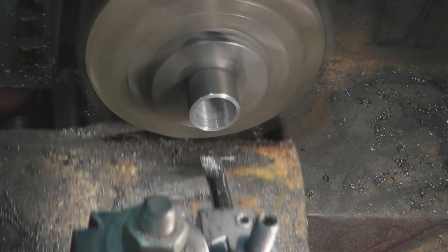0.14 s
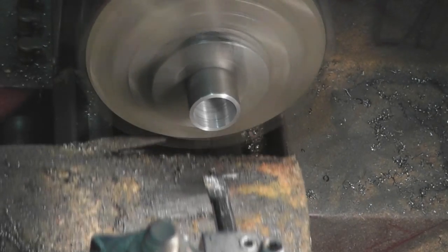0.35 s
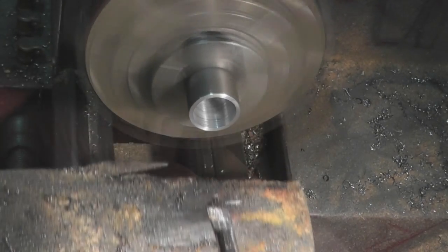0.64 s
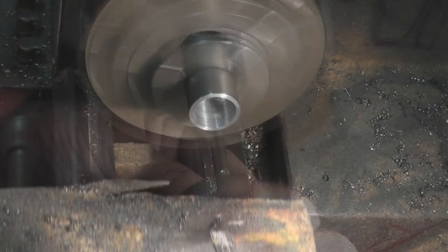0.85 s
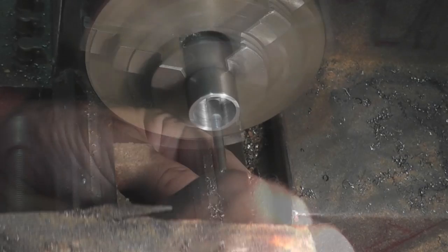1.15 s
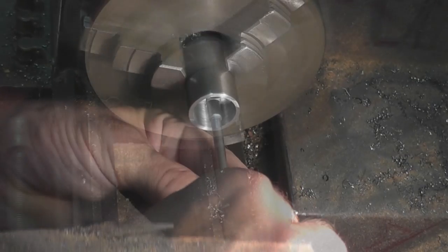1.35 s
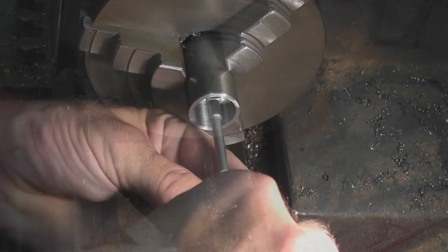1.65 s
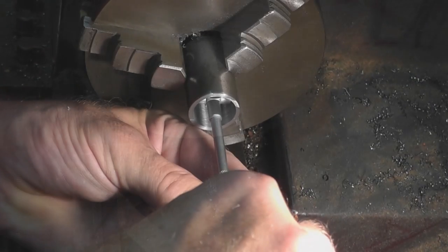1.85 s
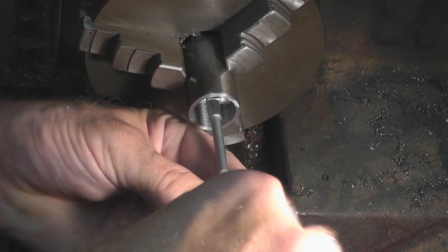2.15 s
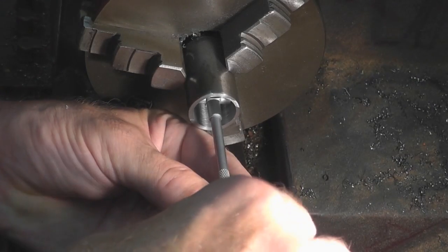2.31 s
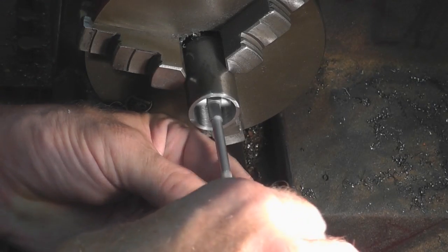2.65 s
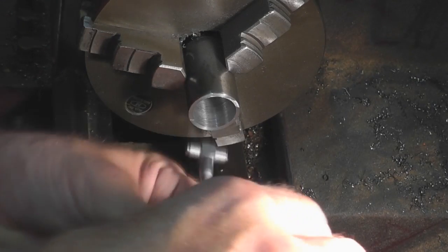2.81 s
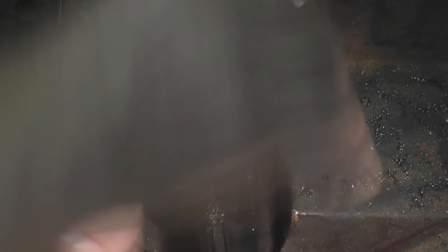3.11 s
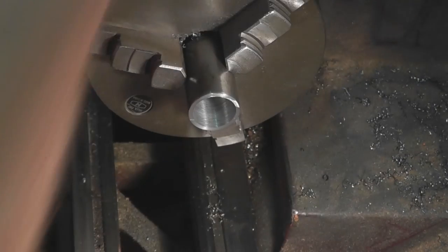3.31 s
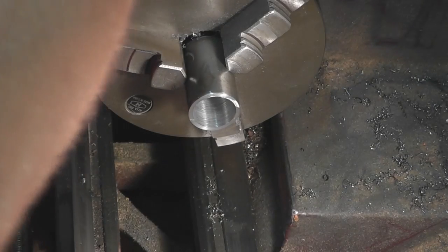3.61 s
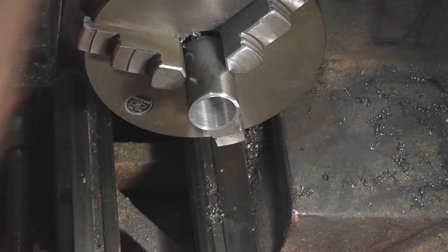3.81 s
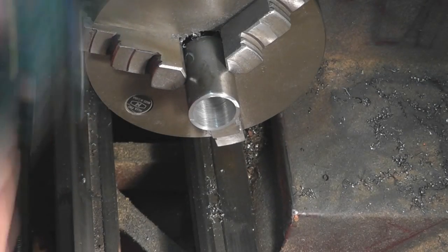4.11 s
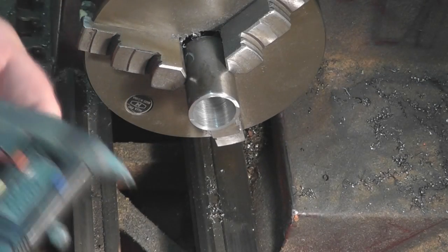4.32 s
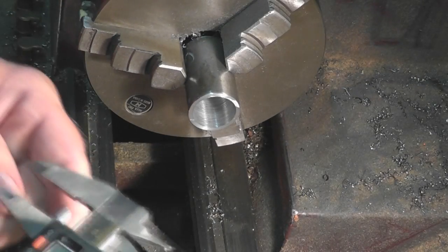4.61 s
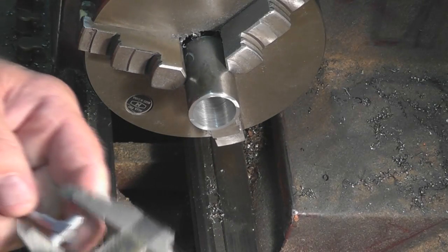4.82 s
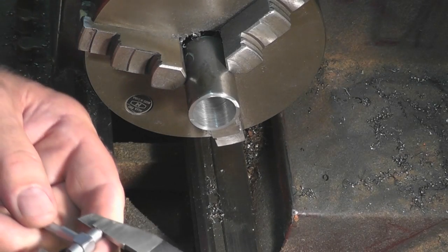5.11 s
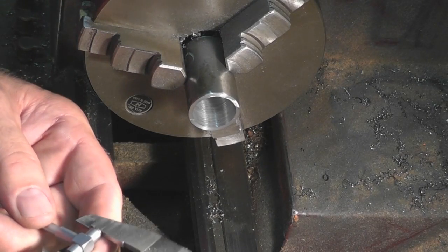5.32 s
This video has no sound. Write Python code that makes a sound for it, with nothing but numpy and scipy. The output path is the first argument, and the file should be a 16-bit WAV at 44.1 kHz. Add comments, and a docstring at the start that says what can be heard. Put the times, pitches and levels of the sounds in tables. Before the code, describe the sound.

A metal lathe coasts to a stop, its gear whir dropping in pitch and fading while loose steel clinks and the carriage rubs and clanks. A steel gauge ticks and scrapes lightly inside the workpiece, then is put down on a hollow board with a sharp, rattling knock. Calipers slide softly and click a few times. It all sounds fairly close, in a small workshop with a faint steady hum.

```python
"""A metal lathe coasts to a stop in a small workshop: its gear teeth excite the resonances of the
casting ever more slowly and its bearings hiss, while the carriage rubs and clanks and loose parts clink.
A steel gauge ticks and scrapes in the bore of the workpiece, then is put down on a hollow board,
whose modes give a low knock. Calipers slide with a soft friction hiss and click on contact.
Reverberation surrounds the contacts, over steady air noise and a faint low hum."""
import sys
import numpy as np
from scipy import signal
from scipy.fft import rfft, irfft, next_fast_len
from scipy.io import wavfile
from scipy.ndimage import map_coordinates

SR = 44100
rng = np.random.default_rng(int(sys.argv[2]) if len(sys.argv) > 2 else 0)


def inscribe(sig):
    """Save sig as 16-bit PCM at rate SR to the path in sys.argv[1].

    A 1-D sig is mono; a 2-D sig holds one channel per row.
    Samples are clipped to [-1, 1] before scaling.
    """
    pcm = np.round(np.clip(np.atleast_2d(sig).T, -1, 1) * 32767)
    wavfile.write(sys.argv[1], SR, pcm.astype(np.int16))


N = 240596
TIME = np.arange(N) / SR
SIZE = next_fast_len(N + SR // 2, real=True)
FREQ = np.fft.rfftfreq(SIZE, 1 / SR)
STOP_S = 2.13  # the spindle comes to rest


def amp(db):
    """Decibels to amplitude ratio."""
    return 10 ** (np.asarray(db) / 20)


def unit(x):
    """Normalisation to rms 1."""
    return x / np.sqrt(np.mean(x ** 2) + 1e-20)


def along(points, hz):
    """Interpolation of (Hz, value) points on a logarithmic frequency axis."""
    f, v = np.transpose(points)
    return np.interp(np.log(hz + 1), np.log(f + 1), v)


def wobble(rate):
    """Random modulation: a smooth curve with rate knots a second."""
    knots = rng.standard_normal(int(N * rate / SR) + 4)
    return unit(map_coordinates(knots, [TIME * rate]))


def add(track, s, sound):
    """Superposition of a sound on a track at s seconds."""
    start = max(round(s * SR), 0)
    track[start:start + len(sound)] += sound[:N - start]


def body(x, spectrum, peaks=(), size=16384):
    """Resonant filtering: a minimum-phase response of unit energy, a broad spectrum with peaks."""
    hz = np.fft.rfftfreq(size, 1 / SR)
    lift = 1 + sum(amp(db) ** 2 / (1 + (2 * (hz - centre) / width) ** 2) for centre, width, db in peaks)
    cepstrum = irfft(np.log(amp(along(spectrum, hz)) * np.sqrt(lift)))
    response = irfft(np.exp(rfft(2 * cepstrum[:size // 2], size)))
    return signal.oaconvolve(x, response / np.linalg.norm(response))[:N]


def spread(a, b, coherence):
    """Partial coherence: two independent signals mix into a correlated stereo pair."""
    angle = np.arccos(np.clip(along(coherence, FREQ), -1, 1)) / 2
    mid, side = irfft(rfft([a, b], SIZE) * [np.cos(angle), np.sin(angle)], SIZE)[:, :len(a)]
    return np.array([mid + side, mid - side])


def contact(db, rise, t60):
    """Contact chatter: a force of random sign that swells and decays exponentially."""
    t = TIME[:SR // 4]
    return amp(db - 60 * t / t60) * (1 - np.exp(-t / rise)) * np.sign(rng.standard_normal(len(t)))


def blows(rows):
    """The summed force of successive impacts."""
    force = np.zeros(N)
    for s, db, rise, t60 in rows:
        add(force, s, contact(db, rise, t60))
    return force


def soften(x, bright_hz):
    """Contact compliance: a softer contact shifts its energy away from the treble."""
    pole = np.exp(-2 * np.pi * bright_hz / SR)
    return signal.lfilter([np.sqrt(1 - pole ** 2)], [1, -pole], x)


def ringing(modes, swell_s):
    """Modal vibration: damped sinusoids that build up smoothly."""
    t = TIME[:SR // 2]
    vibration = sum(amp(db - 60 * t / t60) * np.sin(2 * np.pi * hz * t) for hz, db, t60 in modes)
    return (1 - np.exp(-t / swell_s)) ** 2 * vibration


def taps(rows, spectrum, peaks, width_hz, lift_db, t60, dulling):
    """Impact excitation: a strike and its chatter favour one resonance; hard taps ping, light ones tick."""
    out = np.zeros(N)
    hardest_db = max(row[1] for row in rows)
    for s, db, hz, bright_hz in rows:
        ping = (hz, width_hz, lift_db - dulling * (hardest_db - db))
        chatter = contact(db, 0.00029, t60)
        strike = np.linalg.norm(chatter) * signal.unit_impulse(len(chatter))
        force = amp(-1) * chatter + amp(-7) * strike
        add(out, s, body(soften(force, bright_hz), spectrum, [*peaks, ping]))
    return out


def friction(length_s, db, taper):
    """Sliding friction: a tapered burst of random force."""
    window = signal.windows.tukey(int(length_s * SR), taper)
    return amp(db) * window * rng.standard_normal(len(window))


def strokes(rows, spectrum, peaks, width_hz, lift_db, taper):
    """Frictional excitation: each stroke favours one resonance of a body."""
    out = np.zeros(N)
    for s, length_s, db, hz in rows:
        add(out, s, body(friction(length_s, db, taper), spectrum, [*peaks, (hz, width_hz, lift_db)]))
    return out


def in_room(x, wet_db, scatter_db=-4, scatter_hz=10500):
    """Scattering and reverberation: the top treble reaches left and right a little differently; the tail's
    treble dies first."""
    # Each row: frequency in Hz, reverberation time in seconds.
    decay_times = [(100, 0.91), (400, 0.29), (1400, 0.34), (4000, 0.26), (12000, 0.2)]
    # The diffuse field. Each row: frequency in Hz, left-right coherence.
    coherence = [(250, 0.35), (900, 0.13), (4000, 0.89), (14000, 0.35)]
    hz, t, noise = signal.stft(rng.standard_normal((2, SR // 2)), SR, nperseg=256)
    envelope = amp(-60 * t / along(decay_times, hz)[:, None]) * (1 - np.exp(-t / 0.00088))
    tails = signal.istft(noise * envelope, SR, nperseg=256)[1]
    tails = spread(*tails, coherence) / np.linalg.norm(tails[0])
    reverberation = signal.oaconvolve(x[None], tails, axes=1)[:, :N]
    # short waves reach left and right by different paths
    paths = rng.standard_normal(SR // 1000)
    highpass = signal.butter(2, scatter_hz, "high", fs=SR, output="sos")
    paths = signal.sosfilt(highpass, paths / np.linalg.norm(paths))
    side = amp(scatter_db) * np.convolve(x, paths)[:N]
    return np.array([x + side, x - side]) + amp(wet_db) * reverberation


def grit(rate, scatter_db):
    """A Poisson process of tiny impacts, rate a second, at rms 1."""
    hits = rng.random(N) < rate / SR
    return unit(hits * rng.standard_normal(N) * amp(scatter_db * rng.standard_normal(N)))


def lathe(full_mesh_hz=297, shake_hz=42):
    """Forced vibration: gears and bearings drive the casting while friction brakes them ever harder."""
    # Gear and bearing spectra. Each row: frequency in Hz, spectral level in dB.
    gear_spectrum = [(40, -49), (100, -18.5), (170, -2.5), (260, 1), (400, -3), (500, -5.5), (900, -8),
                     (1500, -13), (1900, -14), (3000, -27.5), (6000, -41.5)]
    bearing_spectrum = [(500, -20), (1500, 1.5), (2200, -3.5), (3800, -1.5), (4700, -8.5), (7000, -9),
                        (8500, -13.5), (11000, -16), (13000, -20.5), (16000, -28)]
    # Resonances of the casting. Each row: frequency in Hz, width in Hz, lift in dB.
    casting = [(310.5, 21, 2.5), (378.3, 15.4, 10), (459.5, 13, 3), (578.2, 7.6, 10), (752, 10, 6),
               (836, 16.6, 5.5), (904, 26, 7), (1069, 16, 10.5), (1114, 11, 3), (1326, 18, 10.5),
               (1409, 34, 10), (1520, 29, 9), (1630, 30, 2.5), (2104, 12, 6), (2227, 33, 10.5),
               (2620, 66, 7.5), (2860, 73, 4.5), (3055, 14, -1), (3300, 39, -16), (3680, 140, 0),
               (4370, 60, -19), (5103, 63, 12.5), (5760, 120, 3), (6430, 240, 6.5), (7070, 100, 4),
               (10200, 150, 2.5)]
    # Gear stage tones. Each row: multiple of the mesh rate, relative level in dB.
    stages = [(0.621, -15), (.97, -6.5), (1.19, -13), (1.941, -24)]
    # The radiated noise. Each row: frequency in Hz, left-right coherence.
    coherence = [(80, 0.21), (250, 0.91), (600, 0.61), (1200, 0.53), (3500, 0.92), (8000, 1), (14000, 0.13)]
    speed = np.clip(1 - TIME / STOP_S, 0, 1) ** 0.6  # share of full speed
    mesh_hz = full_mesh_hz * speed
    cycles = np.cumsum(mesh_hz) / SR
    phase = 2 * np.pi * cycles
    # backlash makes every tooth land with a different force
    teeth = unit(np.diff(np.floor(cycles), prepend=0) * (1 + rng.standard_normal(N)))
    rolling = spread(*rng.standard_normal((2, N)), coherence)
    gears = np.array([body(side + amp(-11) * teeth, gear_spectrum, casting) for side in rolling])
    # uneven load smears each stage's tone; slow gears radiate less
    tones = sum(amp(db + 1.5 * wobble(shake_hz)) * np.sin(order * phase + wobble(shake_hz))
                for order, db in stages)
    drone = amp(-2.5) * speed * tones
    # the rollers rub hardest as each tooth takes the load
    rubbing = spread(*rng.standard_normal((2, N)), coherence) * (1 + 0.054 * np.cos(phase))
    crackle = amp(-10) * grit(2 * mesh_hz, scatter_db=1)
    bearings = np.array([body(side + crackle, bearing_spectrum, casting) for side in rubbing])
    drag = spindle_drag()
    gear_gain = np.hypot(amp(-29) * speed ** 1.87, amp(-40) * drag)
    bearing_gain = np.hypot(amp(-36) * speed ** 2.35, amp(-50.5) * drag)
    flutter = amp(0.63 * wobble(21.3))
    return flutter * (gear_gain * (gears + drone) + bearing_gain * bearings)


def background(hum_hz=94.5):
    """Ambient noise: steady workshop air and a randomly modulated hum, a little to the right."""
    # Air noise. Each row: frequency in Hz, spectral level in dB.
    spectrum = [(20, -33), (35, -28), (50, -3), (75, -4), (130, -3.5), (250, -5), (400, -5.5), (650, -8.5),
                (950, -12.5), (1700, -19.5), (3100, -25.5), (6000, -29), (15500, -31)]
    # Its peaks. Each row: frequency in Hz, width in Hz, lift in dB.
    peaks = [(96, 15, 4.5), (192.5, 28, 1.5), (395.6, 7.9, 7.5), (883, 9.5, 9.5), (2035, 160, 5),
             (2690, 44, 7)]
    # Each row: frequency in Hz, left-right coherence.
    coherence = [(30, .2), (70, 0.69), (180, 0.55), (550, 0.34), (1650, 0.53), (4500, 1), (9000, 0.81),
                 (15000, .15)]
    air = spread(*[body(noise, spectrum, peaks) for noise in rng.standard_normal((2, N))], coherence)
    hum = amp(-61 + 1.5 * wobble(6.2)) * np.sin(2 * np.pi * hum_hz * TIME + 0.5 * wobble(13))
    return (amp(-54) * air + hum) * amp([[-0.5], [0.5]])


def carriage(groan_s=1.026, groan_hz=390):
    """Friction, then impact: the carriage rubs along its ways and its slide sets the bed ringing."""
    # Each row: start in seconds, length in seconds, level in dB, resonance in Hz.
    rubs = [(0, 0.049, -24.5, 288.5), (.452, 0.046, -26.5, 757), (1.005, 0.034, -30, 390),
            (1.04, 0.035, -31, 940)]
    # Impact and rebound. Each row: start in seconds, relative level in dB, rise and t60 in seconds.
    clanks = [(1.077, -9.5, 0.0056, 0.069), (1.09, -23.5, 0.004, 0.12)]
    # Spectra of ways and slide. Each row: frequency in Hz, spectral level in dB.
    ways_spectrum = [(100, -19), (300, 3.5), (800, 3.5), (1500, 1), (2300, -7), (3200, -9), (4200, -12),
                     (6500, -17), (10000, -34), (16000, -56)]
    slide_spectrum = [(40, -18), (150, -4), (400, 2), (1000, 1), (2000, -2.5), (4000, 0.5), (5200, -9),
                      (6500, -10.5), (9500, -8.5), (12000, -13), (16000, -17)]
    # Their resonances. Each row: frequency in Hz, width in Hz, lift in dB.
    ways_peaks = [(2910, 93, 16.4), (1550, 53, 2.8), (6540, 150, 3.8)]
    slide_peaks = [(570, 27, 17.5), (1484, 28, 9.5), (2820, 43, 10), (3730, 280, 4.5), (6320, 120, 17),
                   (8070, 290, 13), (8900, 150, -7), (9800, 120, 1), (11170, 260, 15)]
    # Each row: frequency in Hz, level in dB, t60 in seconds.
    bed_modes = [(555, -36, 0.14), (588, -33, 0.24), (776, -27, 0.17), (1390, -27, 0.23)]
    rubbing = strokes(rubs, ways_spectrum, ways_peaks, width_hz=17.6, lift_db=19, taper=0.23)
    clank = amp(0.5) * body(blows(clanks), slide_spectrum, slide_peaks)
    add(clank, clanks[0][0], ringing(bed_modes, swell_s=0.006))
    # friction pumps up the bed's lowest mode just before the slide hits
    add(clank, groan_s, ringing([(groan_hz, -5, 0.21)], swell_s=0.038))
    return in_room(rubbing + clank, wet_db=-7)


def loose_parts(jingles_per_s=7, jingle_hz=3920, heavy_db=-26):
    """Impact ringing of loose steel: clear clinks, and faint random ones that fade as the lathe slows."""
    # Each row: start in seconds, level in dB, resonance in Hz.
    clinks = [(.1072, -14.5, 3680), (.1262, -20.5, 3760), (.2753, -26.5, 4130), (.3606, -29, 5510),
              (.38, -29.5, 3620), (.6045, -31.5, 4970), (1.2216, -33, 4280), (1.5165, -36.5, 3370),
              (1.8397, -39, 3630), (1.9784, -42.5, 3460), (1.9939, -41.5, 3480), (2.0822, -50, 3800),
              (2.197, -54, 3400)]
    # The steel parts. Each row: frequency in Hz, spectral level in dB.
    spectrum = [(200, -32), (2200, -8), (3400, 3.5), (6000, -0.5), (8000, -2), (12000, -18), (16000, -22)]
    count = round(jingles_per_s * STOP_S)
    scatter = rng.standard_normal((count, 2))
    progress = (np.arange(count) + rng.random(count)) / count
    jingles = [(share * STOP_S, -37 - 17 * share + 5 * size, jingle_hz * 2 ** (0.2 * pitch))
               for share, (size, pitch) in zip(progress, scatter)]
    # heavier parts make duller contacts
    rows = [(s, db, hz, 7000 / 2 ** (0.076 * max(db - heavy_db, 0))) for s, db, hz in [*clinks, *jingles]]
    clinking = taps(rows, spectrum, [], width_hz=110, lift_db=15, t60=0.022, dulling=0.23)
    return in_room(clinking, wet_db=-7.5)


def sliding_steel():
    """Friction noise: smooth steel faces slide over each other with a soft, narrow hiss."""
    # Each row: start in seconds, length in seconds, level in dB, resonance in Hz.
    swishes = [(.46, 0.2, -63, 6550), (1.915, 0.035, -64, 6600), (3.645, 0.039, -54, 7850),
               (4.53, 0.11, -61, 12100), (4.795, 0.097, -65, 6050)]
    # The hiss. Each row: frequency in Hz, spectral level in dB.
    spectrum = [(1500, 6), (4000, 1), (7000, 1), (11000, 4.5), (14000, -8.5), (16000, -18.5)]
    return in_room(strokes(swishes, spectrum, [], width_hz=260, lift_db=12, taper=0.33), wet_db=-4.5)


def spindle_drag(start_s=1.828, rise_s=0.018, t60=0.97, release_s=0.073):
    """Envelope of frictional drag: the spindle catches, drags ever more weakly and lets go at rest."""
    t = np.maximum(TIME - start_s, 0)
    release = np.clip((STOP_S - TIME) / release_s, 0, 1) ** 2
    return (1 - np.exp(-t / rise_s)) * amp(-60 * t / t60) * release


def gauge_in_bore(rise_s=0.00058, t60=0.03, slip_s=0.007):
    """Stick and slip: the gauge catches with a tick, then scrapes on, exciting the bore's resonances."""
    # Each row: start in seconds, tick level in dB, scrape level in dB, scrape length in seconds.
    touches = [(2.5889, -43.5, -64, .012), (2.6697, -48.5, -67.5, 0.013), (2.8085, -40, -47.5, 0.032),
               (2.847, -32.5, -36, 0.019)]
    # The gauge. Each row: frequency in Hz, spectral level in dB.
    spectrum = [(100, -22), (350, 4.5), (900, 5.5), (2700, -7.5), (3700, -4.5), (6000, 2.5), (8000, -6),
                (13000, -4.5), (16000, -14)]
    # Each row: frequency in Hz, width in Hz, lift in dB.
    bore_peaks = [(368, 38, 17), (2010, 15, 17.5), (2670, 28, 7), (3660, 130, 12), (5220, 140, 19.5),
                  (6250, 62, 8.5), (10160, 300, 8.5)]
    force = blows([(s, db, rise_s, t60) for s, db, _, _ in touches])
    for s, _, db, length_s in touches:
        add(force, s + slip_s, friction(length_s, db, taper=0.6))
    return in_room(body(force, spectrum, bore_peaks), wet_db=-9.5)


def gauge_contacts(rattle_s=0.0145, rock_s=0.0358, loss_db=5.5):
    """Inelastic rebound: after each landing the gauge's sliding parts rattle and it rocks twice."""
    # The gauge brushes the board, then lands on one end, flat, and on the other end.
    # Each row: start in seconds, crack level in dB, rise in seconds, board level in dB,
    # steel level relative to the crack in dB, contact brightness in Hz.
    landings = [(3.661, -57, .006, -38.5, -20, 9000), (3.7703, -30.5, 0.00018, -19.5, -25, 20000),
                (3.8059, -16, 0.0003, -5, -15.5, 13000), (3.9037, -30, 0.0062, -22.5, -13, 1200)]
    for s, crack_db, rise, board_db, steel_db, bright_hz in landings:
        t60 = 0.03 + 6 * rise  # softer landings last longer
        dull_hz = 0.22 * bright_hz
        yield s, crack_db, rise, t60, board_db, steel_db, bright_hz
        yield s + rattle_s, crack_db - 12, 0.004, 0.1, board_db - 8, steel_db, dull_hz
        for k in range(2):
            start = s + (k + 1) * rock_s
            lost_db = k * loss_db
            yield start, crack_db - 16 - lost_db, 0.002, 0.07, board_db - 11 - lost_db, steel_db, dull_hz


def knock(skid_s=3.903, skid_length_s=0.0665, skid_db=-37.5, skid_hz=3300):
    """Free vibration after impact: the gauge lands with a crack, rings with the hollow board and skids."""
    # Modes of board and gauge. Each row: frequency in Hz, relative level in dB, t60 in seconds.
    board_modes = [(326.3, -19.5, 0.54), (365.3, -8.5, 0.12), (384, 5, 0.081), (412.5, -2, 0.06),
                   (526, -20, 0.174)]
    steel_modes = [(950, -6.5, 0.29), (1295, -9, 0.36), (1574, 0, 0.14), (1910, -4, 0.13), (2230, 1, 0.092),
                   (2590, 1, 0.16), (2773, -10, 0.098), (3770, -20, 0.18), (4880, -1, 0.082),
                   (5170, -6, 0.065)]
    # Spectra of crack and skid. Each row: frequency in Hz, spectral level in dB.
    crack_spectrum = [(60, -27), (200, -8), (450, 7), (700, 3), (1500, -2.5), (1820, -9.5), (2100, -1),
                      (2400, -13), (2700, -1), (3100, -10.5), (5000, -4.5), (8000, -8), (11000, -7.5),
                      (16000, -17)]
    skid_spectrum = [(400, -18), (1450, 2.5), (2100, -16), (3200, -4.5), (6000, -14), (14000, -26)]
    # Their resonances. Each row: frequency in Hz, width in Hz, lift in dB.
    crack_peaks = [(1450, 93, 7.5), (2560, 180, 7), (3440, 62, 6), (4420, 60, -0.5), (6500, 180, 7.5),
                   (7830, 110, 8), (9600, 120, -3), (10800, 210, 3)]
    skid_peaks = [(1450, 190, 7.1)]
    board, steel, force = np.zeros((3, N))
    for s, crack_db, rise, t60, board_db, steel_db, bright_hz in gauge_contacts():
        add(board, s, amp(board_db) * ringing(board_modes, swell_s=0.0051))
        add(steel, s, amp(crack_db + steel_db) * ringing(steel_modes, swell_s=rise))
        add(force, s, soften(contact(crack_db, rise, t60), bright_hz))
    crack = body(force, crack_spectrum, crack_peaks)
    skid = strokes([(skid_s, skid_length_s, skid_db, skid_hz)], skid_spectrum, skid_peaks,
                   width_hz=500, lift_db=3, taper=0.68)
    return in_room(board, wet_db=-13.5) + in_room(steel + skid + crack, wet_db=-3)


def calipers(seat_s=0.001, seat_db=-8.5, seat_overtone=2.42):
    """Damped impact: the jaws click and seat just after, their ringing absorbed by the hand."""
    # Each row: start in seconds, level in dB, resonance in Hz, contact brightness in Hz.
    clicks = [(4.429, -45.5, 2630, 4000), (4.6944, -33.5, 2720, 2800), (4.7884, -50, 3600, 20000),
              (5.0601, -29.5, 3900, 14000), (5.3464, -29.5, 4460, 12000)]
    # The jaws. Each row: frequency in Hz, spectral level in dB.
    spectrum = [(500, -31), (2100, -12), (3200, -3.5), (5500, -3), (7500, -3.5), (8700, -12), (10800, -0.5),
                (12500, -6), (16000, -13.5)]
    # Each row: frequency in Hz, width in Hz, lift in dB.
    beam_peaks = [(2600, 120, -6), (3580, 200, 16.5), (5000, 250, 3), (6100, 170, -3), (7770, 240, 7),
                  (10200, 500, 5)]
    seats = [(s + seat_s, db + seat_db, hz * seat_overtone, bright_hz) for s, db, hz, bright_hz in clicks]
    clicking = taps([*clicks, *seats], spectrum, beam_peaks,
                    width_hz=290, lift_db=17.5, t60=0.0169, dulling=0.27)
    return in_room(clicking, wet_db=-12.5)


def scene():
    """Superposition of the lathe, the hand tools and the workshop's ambient noise."""
    tools = gauge_in_bore() + sliding_steel() + knock() + calipers()
    return lathe() + carriage() + loose_parts() + tools + background()


def record(dry, top_hz=15900):
    """Channel imbalance and band limiting: the deepest bass leans left, the upper bass right."""
    # Each row: frequency in Hz, level of left over right in dB.
    balance = [(40, 6), (130, -7), (300, -3.5), (600, -0.8), (2000, 0), (15000, 0.6)]
    lean_db = along(balance, FREQ) / 2
    return irfft(rfft(dry, SIZE) * amp([lean_db, -lean_db]) * (FREQ < top_hz), SIZE)[:, :N]


dry = scene()
out = record(dry)
inscribe(out)
```